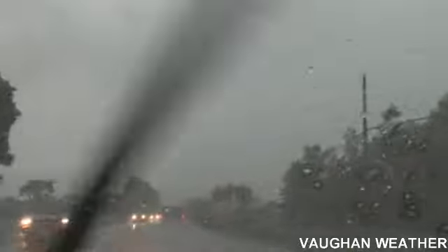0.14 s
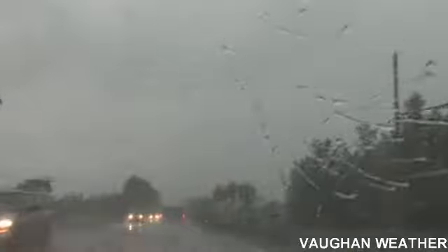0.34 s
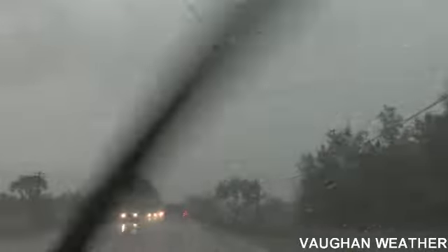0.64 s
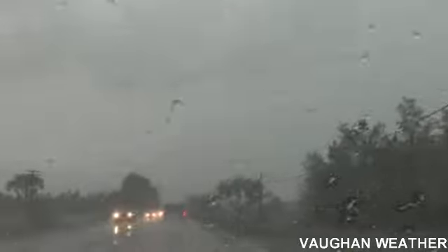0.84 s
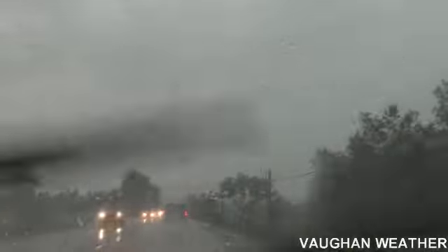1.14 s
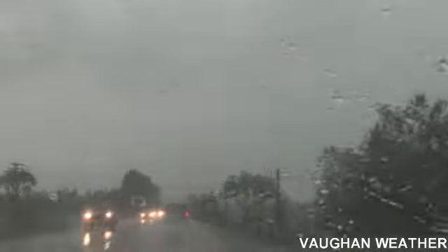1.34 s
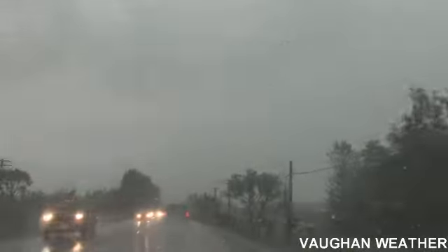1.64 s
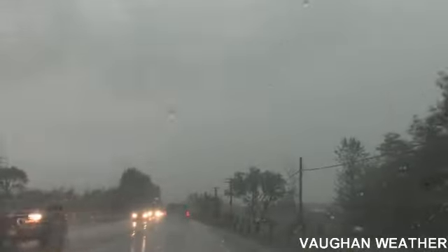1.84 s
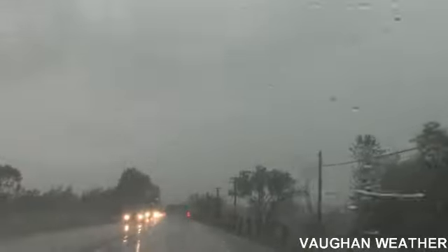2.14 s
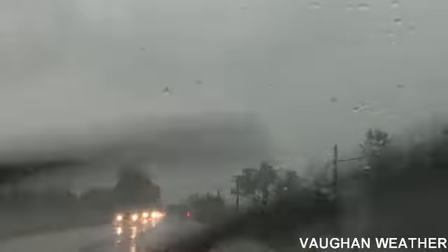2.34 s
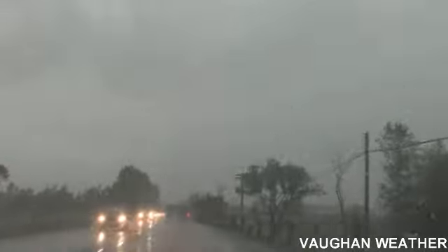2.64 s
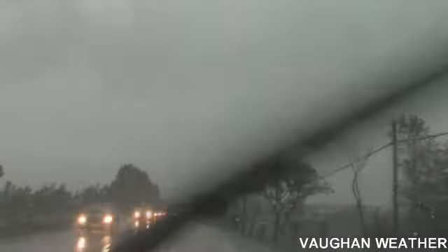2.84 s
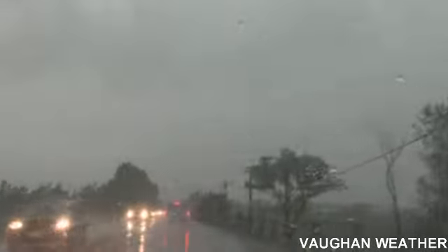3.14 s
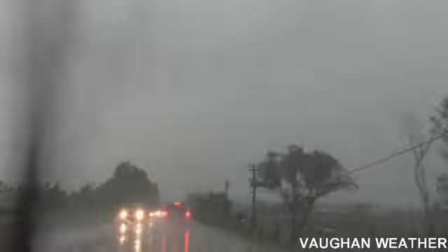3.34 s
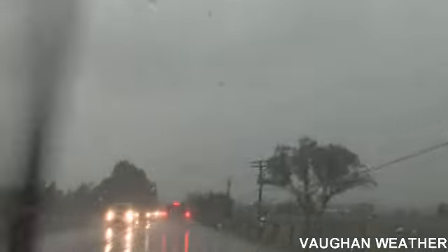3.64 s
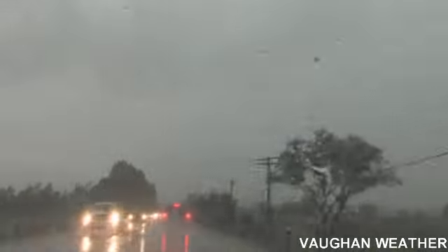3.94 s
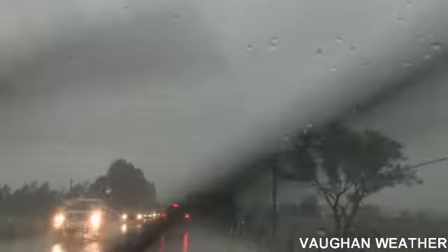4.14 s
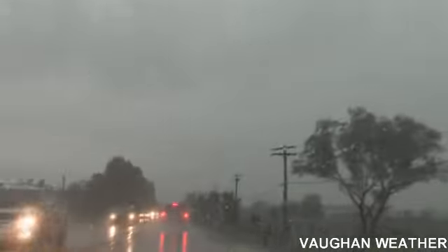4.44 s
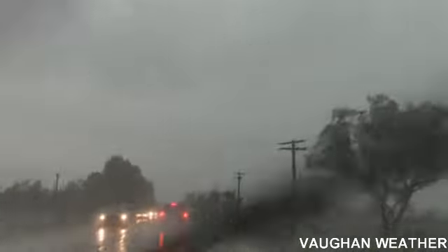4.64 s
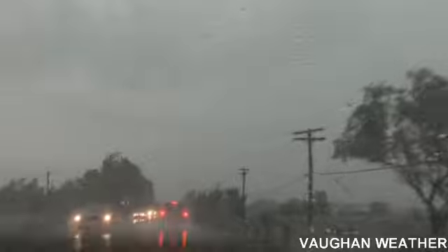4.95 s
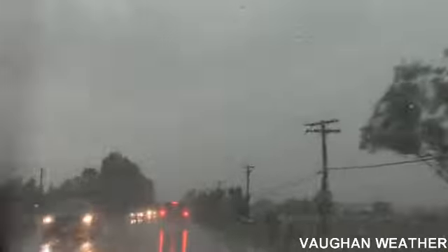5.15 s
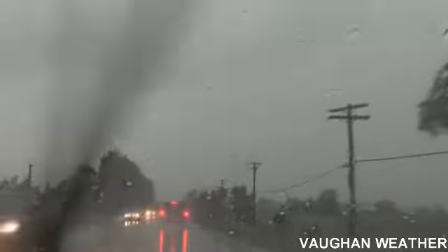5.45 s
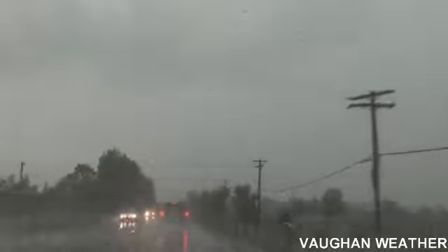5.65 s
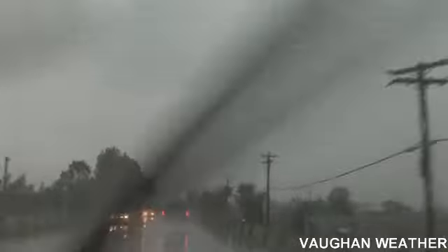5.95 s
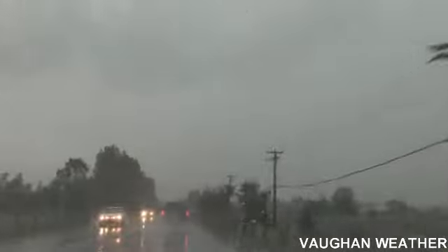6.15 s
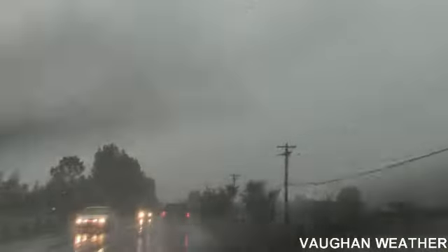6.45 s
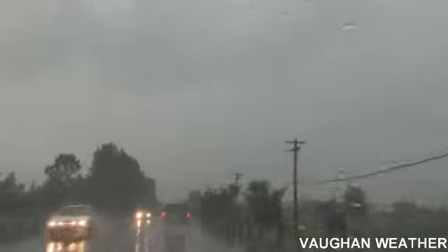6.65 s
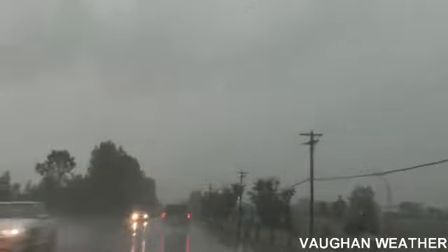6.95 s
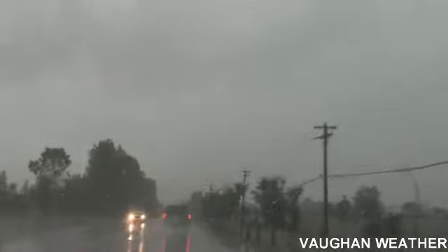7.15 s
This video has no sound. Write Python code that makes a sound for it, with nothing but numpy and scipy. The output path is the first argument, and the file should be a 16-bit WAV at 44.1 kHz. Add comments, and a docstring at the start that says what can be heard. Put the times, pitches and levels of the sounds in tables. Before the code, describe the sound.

Inside a moving car, the microphone sits close behind the windscreen. A low road rumble with frequent small bumps runs throughout and grows slightly, along with a wavering, booming engine drone and the muffled hiss of wet tyres. Fast wipers turn round about every 0.4 seconds, each time with a dull thump and a soft rubbery swish. For the first two seconds heavy rain spatters the glass in sheets, with many large drops ticking sharply above the patter. The rain then eases, returning in lighter flurries at about 3.5 to 4.5 seconds and again around 5.2 seconds, with scattered single ticks. A few faint taps come from the bodywork. At about 6.7 seconds one fat drop smacks the windscreen loudly, making it ring very briefly. Rumble, wipers and light rain carry on to the end at about 7.3 seconds.

```python
"""Inside a car driving through heavy rain, one microphone close behind the windscreen.
From the start the road rumbles and bumps, the engine booms in the cabin and wet tyres hiss outside,
while the wipers thump at each end of their fast sweep and sheets of drops spatter on the glass.
After two seconds the rain eases, with a few lighter flurries to follow.
Near the end, at 6.7 s, one fat drop smacks the windscreen and sets it ringing briefly."""
import sys
import numpy as np
from scipy import signal
from scipy.fft import rfft, irfft, next_fast_len
from scipy.io import wavfile

SR = 44100
rng = np.random.default_rng(int(sys.argv[2]) if len(sys.argv) > 2 else 0)


def dump(signal):
    """Clip the signal to [-1, 1] and save it as 16-bit WAV at the path in sys.argv[1]."""
    limited = np.clip(np.atleast_2d(signal).T, -1, 1)
    pcm = np.round(limited * 32767).astype(np.int16)
    wavfile.write(sys.argv[1], SR, pcm)


N = 321489
TIME = np.arange(N) / SR


def gain_of(db):
    """Decibels to amplitude."""
    return 10 ** (np.asarray(db) / 20)


def unit_rms(x):
    """Scales to an rms of one."""
    return x / np.sqrt(np.mean(x ** 2) + 1e-20)


def db_at(spectrum, hz):
    """A spectrum's level at hz, on a log-frequency axis."""
    freq_hz, level_db = np.transpose(spectrum)
    return np.interp(np.log(hz + 1), np.log(freq_hz + 1), level_db)


def follow(curve):
    """A curve's value at every sample."""
    return np.interp(TIME, *np.transpose(curve))


def add(mix, start_s, sound):
    """Lays a sound into the mix at start_s."""
    start = round(start_s * SR)
    sound = sound[max(-start, 0):]
    part = mix[max(start, 0):][:len(sound)]
    part += sound[:len(part)]


def noise(shape):
    """Steady noise whose amplitude spectrum is shape(hz)."""
    size = next_fast_len(N)
    spectrum = rfft(rng.standard_normal(size)) * shape(np.fft.rfftfreq(size, 1 / SR))
    return unit_rms(irfft(spectrum, size)[:N])


def wander(rate_hz):
    """A random drift, mostly slower than rate_hz."""
    return noise(lambda f: 1 / (1 + (f / rate_hz) ** 4))


def ringing(hz, width_hz):
    """Noise in one resonance."""
    return noise(lambda f: 1 / (1 + ((f - hz) / (0.42 * width_hz)) ** 2))


def mode(t, hz, db, t60_s):
    """One struck resonance: a sine that falls 60 dB in t60_s."""
    return gain_of(db - 60 * t / t60_s) * np.sin(2 * np.pi * hz * t)


def impulse(spectrum, size=2048):
    """The sharpest causal click with this spectrum, peak one."""
    hz = abs(np.fft.fftfreq(size, 1 / SR))
    log_gain = np.log(gain_of(np.maximum(db_at(spectrum, hz), -100)))
    minimum_phase = np.exp(np.conj(signal.hilbert(log_gain)))
    click = np.fft.ifft(minimum_phase).real[:size // 2]
    return click / abs(click).max()


def patter(per_s, spread_db):
    """Randomly timed impacts, many small and a few large, of mean power one."""
    size = gain_of(spread_db * np.minimum(rng.exponential(1, N), 4))
    return unit_rms(size * rng.choice([-1, 1], N) * (rng.random(N) < per_s / SR))


def reflect(hits, wet_db, decay_s):
    """Each hit reaches the microphone with its own cabin reflections: a short, noisy tail."""
    keep = np.exp(-2 / (decay_s * SR))
    energy = signal.lfilter([1 - keep], [1, -keep], hits ** 2 + 1e-20)
    return hits + gain_of(wet_db) * np.sqrt(energy) * rng.standard_normal(len(hits))


# Road and wind as they sound in the cabin: freq_hz, relative_db
ROAD_SPECTRUM = [(6, -40), (14, -16), (22, -7.5), (46, -3), (62, -0.5), (82, -2.5), (150, -9), (185, -8.5),
                 (270, -13.5), (390, -15.5), (440, -20), (560, -21.5), (610, -24.5), (900, -26.5),
                 (1150, -45), (2400, -110)]
# Roar of the tyres on the wet road below: time_s, relative_db
TYRE_ROAR = [(0.0, -34.5), (2.35, -34), (2.75, -35), (2.85, -36), (3.3, -35.5), (3.6, -34), (4.54, -34.5),
             (4.65, -35), (5.8, -33), (6.25, -33.5), (6.37, -36), (6.55, -32.5), (7.1, -32), (7.29, -35.5)]


def road(bass_db=-22.5, growth_db_per_s=0.52, heave_db=2.5, roar_db=10.5, jolts_db=-7, split_hz=108):
    """The body heaves with the road surface under a roar of tyres, with small jolts from the asphalt."""
    bass = noise(lambda f: gain_of(db_at(ROAD_SPECTRUM, f)) / np.sqrt(1 + (f / 92) ** 8))
    above_bass = [(f, db - 10 * np.log10(1 + (split_hz / f) ** 8)) for f, db in ROAD_SPECTRUM]
    roar = noise(lambda f: gain_of(db_at(above_bass, f)))
    jolts = unit_rms(signal.oaconvolve(patter(per_s=70, spread_db=3.0), impulse(above_bass))[:N])
    tyres = (roar + gain_of(jolts_db) * jolts) * gain_of(roar_db + 0.61 * wander(9.0))
    heave = gain_of(bass_db + growth_db_per_s * TIME + heave_db * wander(5.7))
    return bass * heave + tyres * gain_of(follow(TYRE_ROAR))


# Bumps in the road, coming up through the floor: start_s, level_db
ROAD_BUMPS = [(0.408, -12), (0.535, -10), (1.07, -6), (1.226, -7.5), (1.438, -5.5), (1.744, -8.5),
              (2.107, -7), (2.521, -21), (2.851, -7), (3.192, -7), (3.37, -18), (3.512, -8), (3.675, -9),
              (3.892, -4), (4.13, -6.5), (4.58, -17), (4.71, -20), (5.031, -15), (5.399, -6), (5.669, -9.5),
              (5.978, -6.5), (6.21, -15), (6.479, -10), (7.089, -3)]


def bumps(bounce_hz=52.1, rise_s=0.0094, spread_octaves=0.32):
    """Each bump rocks the body for two or three low cycles; short ones rock it faster than long ones."""
    out, t = np.zeros(N), np.arange(SR // 5) / SR
    for (start_s, db), shortness in zip(ROAD_BUMPS, rng.uniform(-0.63, 1, len(ROAD_BUMPS))):
        scaled_t = t * 2 ** (spread_octaves * shortness)
        envelope = scaled_t / rise_s * np.exp(1 - scaled_t / rise_s)
        add(out, start_s, gain_of(db) * envelope * np.sin(2 * np.pi * bounce_hz * scaled_t))
    return out


# The engine's drone, filling the cabin around the microphone: time_s, relative_db
ENGINE_DRONE = [(0.0, -16), (0.33, -33), (1.25, -23), (1.45, -18), (1.62, -26), (2.25, -25), (2.53, -16),
                (2.62, -38), (2.77, -10), (2.9, -21.5), (4.8, -25), (5.42, -18.5), (5.53, -33),
                (6.25, -19.5), (6.5, -26), (7.29, -18.5)]


def engine(pitch_hz=105.35, tone_db=-12, boom_db=0.5, shaken_db=-12.5):
    """A wavering engine tone inside the cabin's boom, which swells when the wipers shake the body."""
    cycles = np.cumsum(pitch_hz * (1 + 0.0437 * wander(5.75))) / SR
    tone = unit_rms(np.sin(2 * np.pi * cycles))
    boom = ringing(106, width_hz=28)
    drone = gain_of(follow(ENGINE_DRONE))
    shaken = gain_of(shaken_db) * reversal_swells(lag_s=0.013, spread_s=0.078)
    return drone * gain_of(tone_db) * tone + np.hypot(drone * gain_of(boom_db), shaken) * boom


# Spray out at the wheels, heard from inside: freq_hz, relative_db
SPRAY_SPECTRUM = [(400, 4), (700, 8.5), (900, 5), (1080, 5.5), (1300, 5.5), (1650, 1), (2300, -1),
                  (3700, -1.5), (5200, -3.5), (6500, -11.5), (9000, -17), (13000, -27), (15500, -40)]
# Resonances in that hiss: pitch_hz, width_hz, level_db
SPRAY_RESONANCES = [(2546, 200, -51), (3235, 320, -49.5)]


def spray(hiss_db=-39):
    """Wet tyres hiss, dulled by the closed windows and swelling with their roar."""
    hiss = gain_of(hiss_db) * noise(lambda f: gain_of(db_at(SPRAY_SPECTRUM, f)))
    rings = sum(gain_of(db) * ringing(hz, width_hz) for hz, width_hz, db in SPRAY_RESONANCES)
    roar_db = follow(TYRE_ROAR)
    return (hiss + rings) * gain_of(roar_db - roar_db.mean() + 0.5 * wander(3.2))


# Small pitched taps on the bodywork around the cabin: start_s, level_db, pitch_hz, t60_s
BODY_TAPS = [(0.482, -14, 2720, 0.015), (3.151, -23, 724, 0.018), (4.508, -18, 606, 0.022),
             (6.302, -26, 1420, 0.0091), (7.186, -25, 1250, 0.013), (7.188, -10.5, 460, 0.019)]


def taps():
    """Each tap rings one heavily damped mode of the bodywork."""
    out, t = np.zeros(N), np.arange(SR // 25) / SR
    for start_s, db, hz, t60_s in BODY_TAPS:
        add(out, start_s, mode(t, hz, db, t60_s))
    return out


# The scuttle panel that carries the wipers, at the foot of the glass: pitch_hz, relative_db, t60_s
SCUTTLE_MODES = [(63, -31, 0.093), (132.7, -6, 0.22), (188.2, -2, 0.18), (242.5, -0.5, 0.065),
                 (299.4, 2.5, 0.065), (373, -4, 0.055), (542, -20.5, 0.023)]
# The blades turning round just beyond the windscreen: start_s, relative_db, tilt_db_per_octave
WIPER_REVERSALS = [(0.069, -14, 5), (0.529, -13.5, -15), (0.946, -10.5, -19), (1.377, -10, -6),
                   (1.871, -10.5, -18), (2.28, -10.5, -10), (2.714, -11.5, 7), (3.145, -9.5, -13),
                   (3.639, -8, -1), (4.004, -9, 0), (4.522, -7, 5), (4.927, -8.5, -8), (5.41, -11.5, -5),
                   (5.83, -10.5, -9), (6.298, -9, 16.5), (6.693, -9.5, -10), (7.143, -14, -7)]


def wipers(knock_db=-1.5, shudder_db=-10.5, swish_db=-24, contact_s=0.005):
    """At each reversal the rubber swishes and shudders and the blade flips over, shaking the scuttle."""
    knocks, t = np.zeros(N), np.arange(SR // 5) / SR
    modes = np.array([(-1) ** k * mode(t, *row) for k, row in enumerate(SCUTTLE_MODES)])
    modes *= 1 - np.exp(-t / contact_s)  # soft rubber contact
    octaves = np.log2([hz for hz, _, _ in SCUTTLE_MODES])
    for start_s, db, tilt in WIPER_REVERSALS:
        panel = gain_of(tilt * octaves) @ modes
        add(knocks, start_s, gain_of(db + knock_db) * panel / abs(panel).max())
    rubbed_panel = signal.oaconvolve(rng.standard_normal(N), modes.sum(0))[:N]
    shudder = gain_of(shudder_db) * unit_rms(rubbed_panel)
    swish = gain_of(swish_db) * ringing(470, width_hz=570)
    return knocks + reversal_swells(lag_s=0.0041, spread_s=0.044) * (shudder + swish)


def reversal_swells(lag_s, spread_s):
    """One soft swell for each wiper reversal, in proportion to its thump."""
    return sum(gain_of(db) * np.exp(-0.5 * ((TIME - start_s - lag_s) / spread_s) ** 2)
               for start_s, db, _ in WIPER_REVERSALS)


# Steady rain on the windscreen, right in front of the microphone: time_s, relative_db
STEADY_RAIN = [(0.06, -37), (0.15, -32), (0.33, -29.5), (0.455, -32.5), (0.52, -32.5), (0.65, -28),
               (0.7, -31.5), (0.8, -27), (0.862, -38), (0.93, -33.5), (1.12, -40.5), (1.2, -36),
               (1.55, -35.5), (1.7, -41.5), (1.9, -39.5), (2.85, -46.5), (3.35, -41.5), (3.46, -37.5),
               (3.57, -37), (3.62, -39.5), (3.8, -38.5), (4.09, -40.5), (4.22, -45), (4.74, -42),
               (5.06, -42), (5.18, -39), (5.6, -43.5), (7.29, -48)]
# Sheets of water that slap the same glass: start_s, length_s, relative_db
WATER_SHEETS = [(0.019, 0.013, -30.5), (0.243, 0.032, -37), (0.292, 0.034, -28), (0.468, 0.069, -30.5),
                (0.72, 0.097, -29.5), (0.937, 0.1, -42), (1.168, 0.05, -38.5), (1.758, 0.036, -38),
                (1.99, 0.094, -32), (3.664, 0.016, -39), (4.274, 0.26, -41.5), (5.165, 0.11, -33.5),
                (5.298, 0.048, -34), (5.346, 0.067, -34.5)]


def rainfall(rise_share=0.46, drain_s=0.018):
    """How hard the water hits the glass: steady rain plus sheets that build, hold and stop short."""
    power = gain_of(follow(STEADY_RAIN)) ** 2
    for start_s, length_s, db in WATER_SHEETS:
        rise = np.clip((TIME - start_s) / (rise_share * length_s), 0, 1)
        drain = np.exp(-np.maximum(TIME - start_s - length_s, 0) / drain_s)
        power += (gain_of(db) * rise * drain) ** 2
    return np.sqrt(power)


def pings(per_s=330, low_hz=2300, high_hz=5100, decay_cycles=2.4, spots=24):
    """Each drop lands on one spot of glass and rings for a few cycles at that spot's pitch."""
    out, t = np.zeros(N), np.arange(SR // 100) / SR
    hits, spot = patter(per_s, spread_db=2.5), rng.integers(0, spots, N)
    for k, hz in enumerate(np.geomspace(low_hz, high_hz, spots)):
        envelope = (1 - np.exp(-hz * t)) * np.exp(-hz * t / decay_cycles)
        out += signal.oaconvolve(hits * (spot == k), envelope * np.sin(2 * np.pi * hz * t))[:N]
    return unit_rms(out)


# One drop on the glass, heard close up from the dry side: freq_hz, relative_db
SPLAT_SPECTRUM = [(530, -32.5), (900, 1), (1100, -4.5), (1480, -2.5), (2250, -5), (2760, -3.5), (4280, -1),
                  (6270, -9), (12800, -20), (14600, -25.5), (15500, -34.5)]


def rain(coarse_db=-6.5, ping_db=-8.0, gust_db=0.5, flurry_db=0.5, lull_db=-47):
    """Fine drops fizz, middling ones ping and coarse ones crackle as they hit the glass at scattered random
    times."""
    strength = rainfall() * gain_of(flurry_db * wander(15))
    strength *= strength / np.hypot(strength, gain_of(lull_db))  # light rain mostly sweeps over the car
    fine = reflect(patter(per_s=3000, spread_db=4.5), wet_db=-3.5, decay_s=0.012)
    hard_hits = patter(per_s=130, spread_db=2.2)
    hard_hits = unit_rms(hard_hits - 0.55 * np.roll(hard_hits, 1))  # a hard hit is brighter
    coarse = gain_of(coarse_db) * reflect(hard_hits, wet_db=-9, decay_s=0.003)
    splat = impulse(SPLAT_SPECTRUM)
    spatter = signal.oaconvolve(fine + coarse, splat / np.linalg.norm(splat))[:N]
    return (spatter + gain_of(ping_db) * pings()) * strength * gain_of(gust_db * wander(31))


# Single large drops on the glass near the microphone: start_s, relative_db, hardness_0_to_1
LARGE_DROPS = [(0.026, -18, 0.1), (0.1432, -15, 0), (0.2389, -23, 0.8), (0.251, -14, 0.7),
               (0.273, -13, 0.3), (0.3067, -21, 0.2), (0.375, -14, 0.2), (0.421, -18, 0.3),
               (0.5164, -21, 0.5), (0.6128, -19, 0.3), (0.634, -15, 0.3), (0.672, -16, 0.7),
               (0.759, -16, 0.5), (0.788, -18, 0.5), (0.8193, -12, 0.5), (0.947, -17, 0.4),
               (1.1805, -16.5, 0.2), (1.195, -15, 0.2), (1.229, -16.5, 0), (1.2553, -18, 0.4),
               (1.2648, -25, .9), (1.288, -21, 0.6), (1.384, -22, 0), (1.4748, -15.5, 0.8),
               (1.5564, -19, 0), (1.636, -18.5, 0.7), (1.7606, -20.5, 0.4), (1.783, -23, 0.7),
               (1.985, -19, 0.4), (1.996, -17, 0.5), (2.011, -14, 0.7), (2.027, -20, 0.6),
               (2.0716, -18, 0.8), (2.99, -23.5, 0.8), (3.081, -26.5, 0.8), (3.3878, -36, 0.7),
               (3.474, -27, 0.4), (3.525, -24, 0.4), (3.544, -26, 0.4), (3.665, -18.5, 0.4),
               (3.7325, -24, 0.5), (3.9554, -18, 0), (4.03, -24, 0.5), (4.3577, -24, 0.2),
               (4.749, -20.5, 0.2), (5.2093, -27, 0.4), (5.308, -19, 0.6), (5.398, -23.5, 0.4)]


def large_drops(boost_db=4.5, soft_wet_db=-2.0, hard_wet_db=-7.0):
    """Single drops tick sharply above the patter; a hard hit is brighter, a soft one splashes more."""
    out, splat = np.zeros(N), impulse(SPLAT_SPECTRUM)
    for start_s, db, hardness in LARGE_DROPS:
        wet_db = np.interp(hardness, [0, 1], [soft_wet_db, hard_wet_db])
        hit = reflect(signal.unit_impulse(1024), wet_db, decay_s=0.004)
        tick = splat - hardness * np.roll(splat, 1)
        add(out, start_s, gain_of(db + boost_db) * np.convolve(hit, tick / abs(tick).max()))
    return out


# The fat drop's smack at close range: freq_hz, relative_db
SMACK_SPECTRUM = [(100, -4), (300, 5), (620, 8), (1100, 4), (1900, 0.5), (3000, -3), (4000, -3.5),
                  (5500, -9), (7000, -9), (11000, -17), (13000, -32), (15000, -50)]
# The windscreen ringing under it: pitch_hz, level_db, t60_s
GLASS_MODES = [(370, -16, 0.03), (700, -8.5, 0.016), (1150, -21, 0.018)]


def fat_drop(start_s=6.661, blow_db=-0.5, rebound_share=0.4, rebound_s=0.00014,
             splash_db=-33, splash_lag_s=0.0075, splash_s=0.004):
    """A fat drop bursts on the glass, which snaps back and knocks; its fragments splash just after."""
    blow, t = np.zeros(N), np.arange(SR // 20) / SR
    add(blow, start_s, -gain_of([blow_db]))
    blow = reflect(blow, wet_db=-3.0, decay_s=0.004)
    rebound = rebound_share * np.roll(blow, round(rebound_s * SR))
    out = signal.oaconvolve(blow - rebound, impulse(SMACK_SPECTRUM))[:N]
    knock = sum(mode(t, hz, db, t60_s) for hz, db, t60_s in GLASS_MODES)
    fragments = unit_rms(np.convolve(rng.standard_normal(len(t)), impulse(SPLAT_SPECTRUM))[:len(t)])
    splash = gain_of(splash_db) * fragments * np.exp(-((t - splash_lag_s) / splash_s) ** 2)
    add(out, start_s, splash - knock)
    return out


def scene():
    """Everything that reaches the microphone behind the windscreen, in mono."""
    driving = road() + bumps() + engine() + spray()
    water = rain() + large_drops() + fat_drop()
    return (driving + water + taps() + wipers())[None]


def record(dry, ceiling=0.9, cutoff_hz=15500):
    """The microphone's recorder rounds off the highest peaks and limits the band."""
    rounded = dry / (1 + (dry / ceiling) ** 8) ** (1 / 8)
    lowpass = signal.firwin(511, cutoff_hz, window=("kaiser", 9), fs=SR)
    return signal.oaconvolve(rounded, lowpass[None], "same")


dry = scene()
out = record(dry)
dump(out)
```